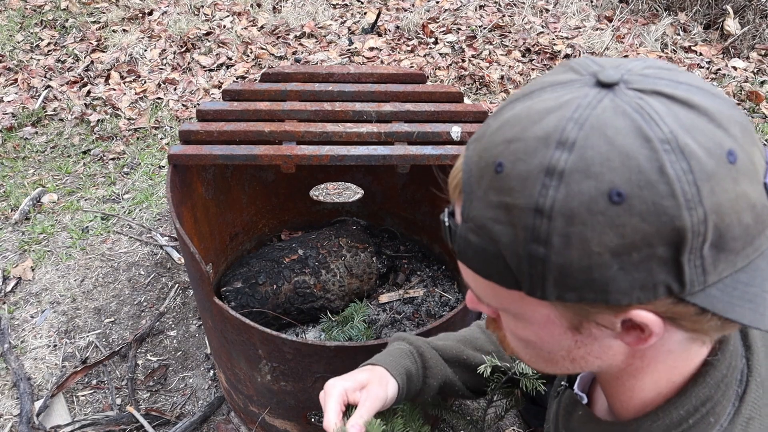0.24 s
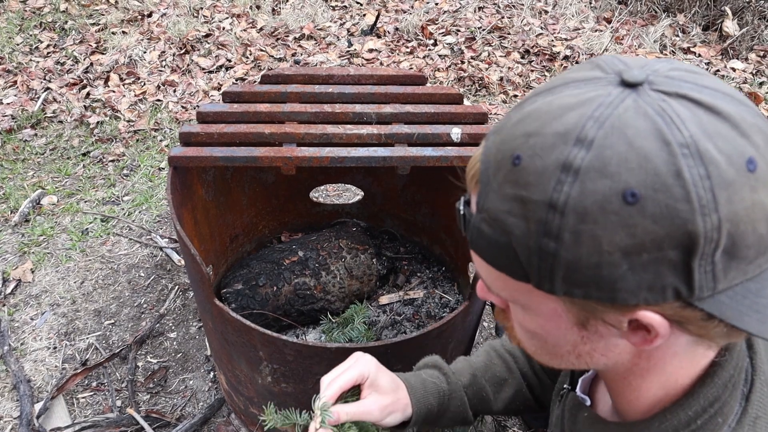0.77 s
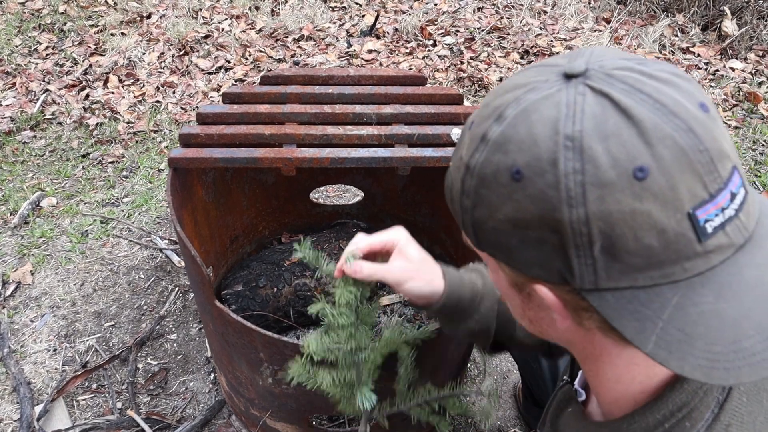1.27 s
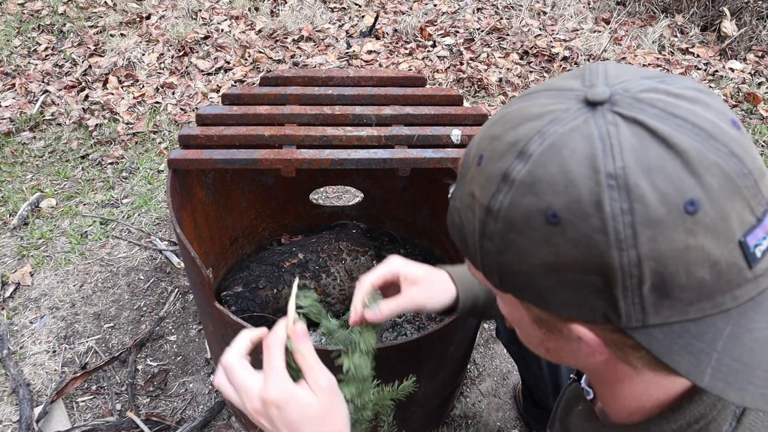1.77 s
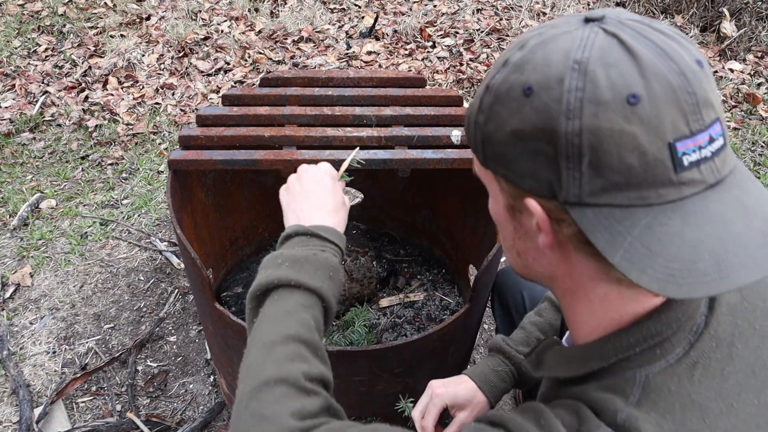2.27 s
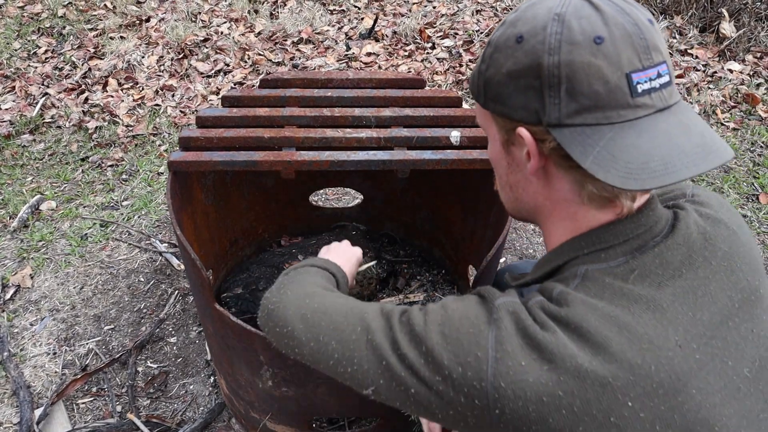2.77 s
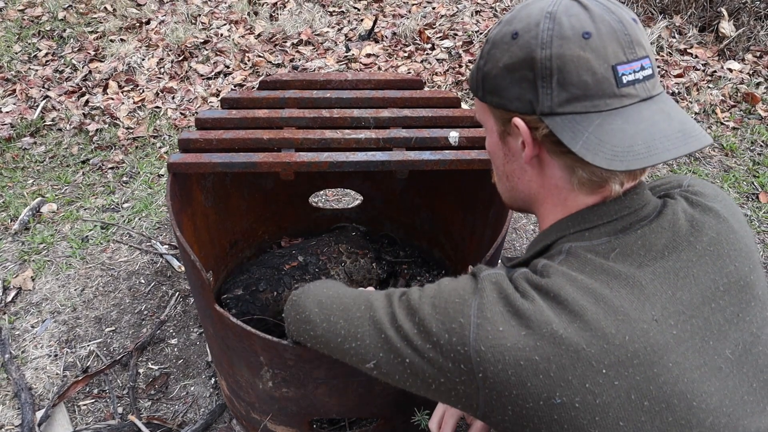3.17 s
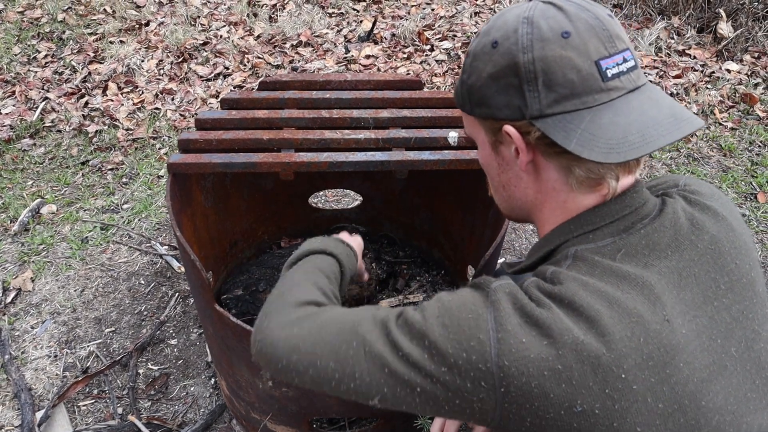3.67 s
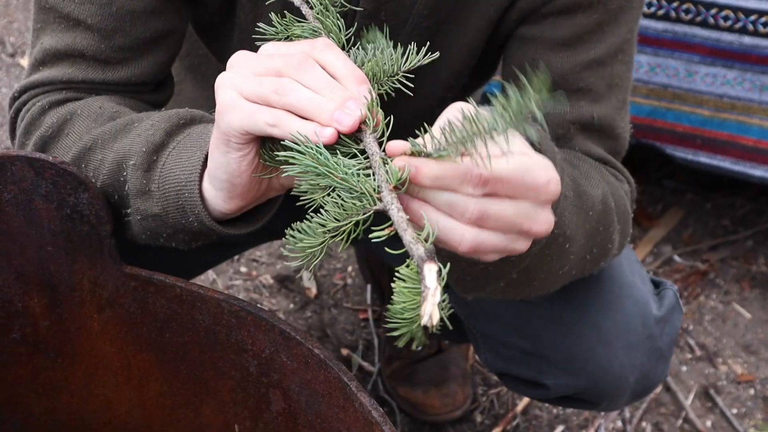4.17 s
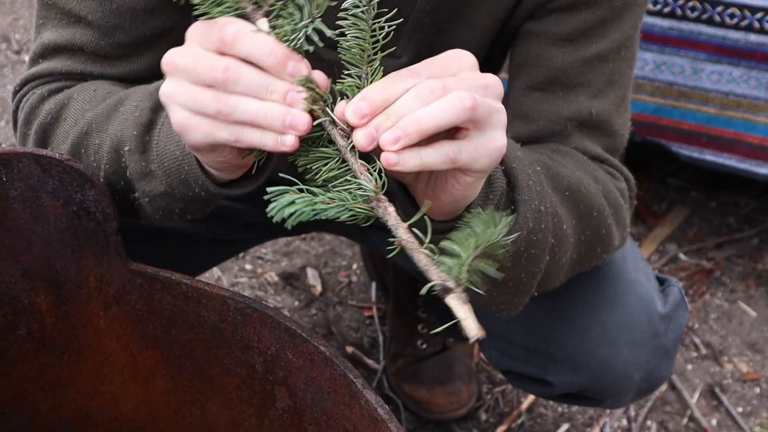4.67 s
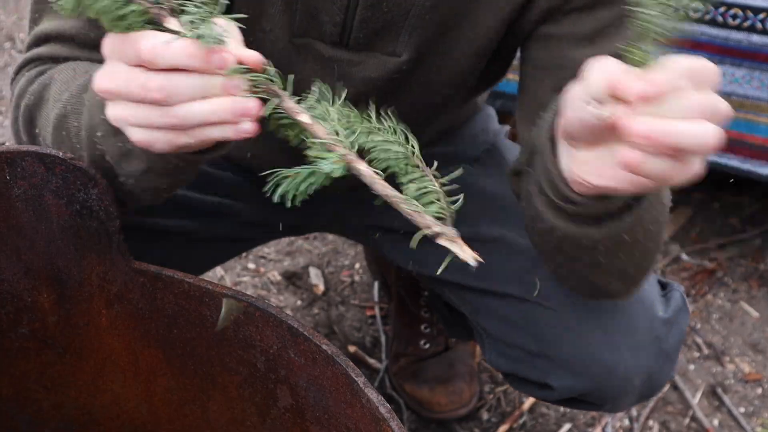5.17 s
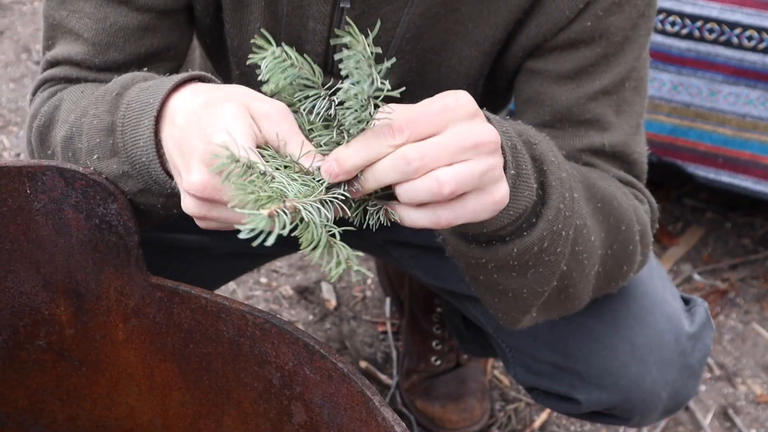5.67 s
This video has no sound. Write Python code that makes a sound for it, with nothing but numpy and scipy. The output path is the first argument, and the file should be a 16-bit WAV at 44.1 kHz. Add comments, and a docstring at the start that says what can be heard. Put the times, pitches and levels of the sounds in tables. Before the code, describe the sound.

Dry, centred close recording of conifer kindling being handled in a quiet wood. A sharp double crack opens, followed by scattered fibre ticks, a tiny rising squeak and brushing needles. Faint sliding, dull rubs and a low thump fill a calmer middle. Plucking crackles resume, peaking in a single hard snap, then fine rustles. Very short echo, soft outdoor wash and slight hiss.

```python
"""In a quiet wood, someone kneels at a steel fire ring and breaks fir twigs for kindling, close by.
Fibres release elastic energy as short damped modes: mostly ticks, twice a sharp snap.
Stick-slip grains make the brushing needles, sliding stems and short rubs; a faint squeak glides upward.
Damped sines make the soft bumps of the body. Decaying noise gives the echo of the ring and the tail
of ground and trees; filtered noise gives the low wash of outdoor air."""
import sys
import numpy as np
from scipy import signal
from scipy.fft import rfft, irfft
from scipy.io import wavfile

SR = 44100
rng = np.random.default_rng(int(sys.argv[2]) if len(sys.argv) > 2 else 0)


def int16_out(signal):
    """Quantize to a 16-bit WAV file."""
    q = np.round(np.clip(np.atleast_2d(signal).T, -1, 1) * 32767)
    wavfile.write(sys.argv[1], SR, q.astype(np.int16))


N = 261072  # length [samples]


def amp(db):
    """Level law: decibels to amplitude ratio."""
    return 10 ** (np.asarray(db) / 20)


def unit(x):
    """Normalisation of power: scales a signal to rms 1."""
    return x / np.sqrt(np.mean(x ** 2) + 1e-20)


def add(mix, s, sound):
    """Linear superposition: adds a sound to the mix in place, from time s."""
    part = mix[max(round(s * SR), 0):][:len(sound)]
    part += sound[:len(part)]


def colour(x, points):
    """Spectral shaping: filters by (Hz, dB) points, interpolated over log frequency, to rms 1."""
    hz, db = np.transpose(points)
    f = np.fft.rfftfreq(len(x), 1 / SR)
    gain = amp(np.interp(np.log(f + 1), np.log(hz + 1), db))
    return unit(irfft(rfft(x) * gain, len(x)))


def ring(hz, width_hz, size=600):
    """Damped resonance: impulse response of one mode, differenced to weaken its bass, at energy 1."""
    t = np.arange(size) / SR
    mode = np.exp(-np.pi * width_hz * t) * np.sin(2 * np.pi * hz * t)
    wave = np.diff(mode, prepend=0)
    return wave / np.linalg.norm(wave)


def thud(hz, width_hz, size=600):
    """Damped resonance: one mode at energy 1, keeping its bass and having less treble than ring."""
    t = np.arange(size) / SR
    wave = np.exp(-np.pi * width_hz * t) * np.sin(2 * np.pi * hz * t)
    return wave / np.linalg.norm(wave)


def slips(length, per_s, spread_db):
    """Stick-slip as a random point process: impulses of either sign, most small and a few large."""
    chance = rng.random(length)
    size = rng.exponential(1, length)
    sign = rng.choice([-1, 1], length)
    return (chance < per_s / SR) * sign * amp(spread_db * np.minimum(size, 4))


# Breaking fibres: (time [s], tick energy [dB], splinter energy [dB], stem energy [dB], stem pitch [Hz])
FIBRE_CRACKS = [(0.1331, -28, -29, -32.5, 3770), (0.1973, 5, -4.5, -4, 2390), (0.216, -14, -31, -29, 3790),
                (0.2247, -12, -22, -23, 3570), (0.2264, -2, -9, -16, 3570), (0.228, 2.5, -5, -5, 3600),
                (0.4047, -38, -20, -27, 3500), (0.5631, -16, -25, -29, 4180),
                (0.6193, -25, -26.5, -34, 3700), (0.6805, -24.5, -31, -27.5, 2120),
                (0.8222, -22, -24, -26, 1810), (0.8649, -24.5, -21, -26.5, 3890),
                (1.0272, -21.5, -30, -38, 1180), (1.1142, -20, -28, -27, 2970),
                (1.1167, -12, -19, -28, 3470), (1.1362, -17.5, -26.5, -24, 2220),
                (1.1696, -18, -25, -25.5, 2710), (1.4989, -35.5, -28.5, -18, 4400),
                (1.5029, -28, -40, -20, 3270), (1.638, -27, -26, -13.5, 2370),
                (1.6443, -25, -27, -13, 1720), (1.6481, -24, -12.5, -12.5, 3760),
                (2.0498, -25.5, -26, -17.5, 1460), (2.2345, -31, -29, -29.5, 2050),
                (2.2391, -34, -27.5, -29, 3420), (2.34, -26, -24, -29.5, 2710),
                (3.9679, -21.5, -50, -34, 4200), (4.1069, -24, -16, -17, 2500),
                (4.1533, -23, -42, -38, 2150), (4.1645, -17, -39, -25, 3630),
                (4.2176, -24, -36.5, -29.5, 4230), (4.321, -18, -32, -33, 1210),
                (4.5105, -21, -24.5, -24, 3560), (4.6892, -16, -42, -9, 3160),
                (4.8708, -19, -35, -20.5, 2460), (5.0553, 2.5, -16, -6.5, 2730),
                (5.0562, -16, -13, -3.5, 3150), (5.0593, -14, -10, -6, 3830),
                (5.5889, -26.5, -30, -25.5, 2340), (5.6406, -22.5, -27, -30, 3680),
                (5.7985, -27, -23.5, -25.5, 2570), (5.9016, -15, -24, -31, 4050),
                (5.916, -15.5, -25, -26, 4090)]
# Stubs tick near one pitch [Hz]; those of weak, fraying fibres stray by up to this share of it
TICK_HZ, TICK_SCATTER = 9960, 0.12


def cracks(rows, tick_width_hz=1600, top_hz=14800, top_width_hz=3500, top_db=-9, splinter_hz=6200,
           splinter_width_hz=1900, stem_width_hz=750, flex_ratio=0.46, flex_width_hz=550, flex_db=-10,
           twist_ratio=1.59, twist_width_hz=700, twist_db=-11, grip_hz=420, grip_width_hz=650, grip_db=-12,
           tear_db=-7, tear_s=0.0014, ragged_db=4, clean_db=-8, lowest_hz=110):
    """Impulsive modal excitation: stub ticks, stem rings, flexes and twists, smaller fibres tear just after."""
    out = np.zeros(N)
    t = np.arange(400) / SR
    grip = amp(grip_db) * ring(grip_hz, grip_width_hz)  # the recoil knocks dully in the fingers
    for s, tick_db, splinter_db, stem_db, stem_hz in rows:
        ragged = max(tick_db, stem_db) < clean_db  # a weak crack frays, a strong one parts more cleanly
        tick_hz = TICK_HZ * (1 + ragged * TICK_SCATTER * (2 * rng.random() - 1))
        # neighbouring modes start with opposite signs, so they add up between their peaks
        tick = ring(tick_hz, tick_width_hz) - amp(top_db) * ring(top_hz, top_width_hz)
        splinter = ring(splinter_hz, splinter_width_hz)
        flex = amp(flex_db) * thud(flex_ratio * stem_hz, flex_width_hz)
        twist = amp(twist_db) * thud(twist_ratio * stem_hz, twist_width_hz)
        stem = thud(stem_hz, stem_width_hz) - flex - twist
        tear = slips(len(t), per_s=12000, spread_db=6) * np.exp(-t / tear_s)
        force = amp(tear_db + ragged * ragged_db) * tear / (np.linalg.norm(tear) + 1e-9)
        force[0] = 1  # the main release comes first
        body = amp(tick_db) * tick + amp(splinter_db) * splinter + amp(stem_db) * (stem + grip)
        add(out, s, np.convolve(force / np.linalg.norm(force), body))
    # thin twigs radiate little bass
    return signal.lfilter(*signal.butter(2, lowest_hz, "highpass", fs=SR), out)


# Spans in which sprigs are bent and plucked: (start [s], end [s])
BENDING_SPANS = [(0.02, 0.19), (0.7, 0.9), (4.7, 5.05), (5.56, 5.92)]
FRAYS_PER_S, FRAY_STEM_HZ = 16, 3400  # the stem pitch varies by half an octave either way
FRAY_TICK_DB, FRAY_SPLINTER_DB, FRAY_STEM_DB = -30, -41, -38
FRAY_SPREAD_DB = 1  # largest departure from these levels, up or down


def frays():
    """Random microfracture: tiny fibres give way under bending, as rows in the columns of FIBRE_CRACKS."""
    rows = []
    for start, end in BENDING_SPANS:
        count = round(FRAYS_PER_S * (end - start))
        for when, strength, pitch in rng.random((count, 3)):
            s = start + (end - start) * when
            db = FRAY_SPREAD_DB * (2 * strength - 1)
            stem_hz = FRAY_STEM_HZ * 2 ** (pitch - .5)
            rows.append((s, FRAY_TICK_DB + db, FRAY_SPLINTER_DB + db, FRAY_STEM_DB + db, stem_hz))
    return rows


# Moves of the hands through the sprigs:
# (start [s], length [s], level of brushing needles [dB], level of sliding stems [dB])
HAND_STROKES = [(0.01, 0.29, -61.5, -66), (0.329, 0.17, -59.5, -60), (0.683, 0.2, -53.5, -51),
                (0.999, 0.26, -46.5, -52.5), (1.045, 0.17, -42, -50.5), (1.213, 0.093, -57.5, -48.5),
                (1.711, 0.16, -52, -51), (1.9, 1.66, -91.5, -62.5), (4.677, 0.077, -57, -54),
                (4.767, 0.063, -58, -52.5), (4.835, 0.058, -49.5, -54.5), (5.041, 0.095, -53, -51.5),
                (5.116, 0.19, -60.5, -58), (5.616, 0.073, -52, -55.5), (5.66, 0.33, -60, -59),
                (5.889, 0.091, -53, -51)]
# Relative spectrum of brushing needles: (frequency [Hz], density [dB per Hz])
NEEDLE_SPECTRUM = [(300, -25), (2000, -10), (4300, -5), (5500, 1), (6400, -8), (8200, -1), (10500, 0),
                   (13000, -5), (16000, -6)]
# Relative spectrum of sliding stems: (frequency [Hz], density [dB per Hz])
STEM_SPECTRUM = [(150, -10), (600, 2.5), (1500, 2.5), (2400, 1.5), (3400, 3.5), (4500, -3.5), (6000, -14),
                 (9000, -8.5), (16000, -7.5)]
HELD_NEEDLES_DB, HELD_STEMS_DB = -69, -66  # sprigs held in the hand never lie quite still
CATCHES_PER_S, CATCH_DB = 70, 2.2  # uneven catching: random levels per second, their standard deviation


def rustle():
    """Friction noise, powers adding: needles flick with a bright grain, bark slides with a duller one."""
    needles, stems = amp(HELD_NEEDLES_DB) ** 2, amp(HELD_STEMS_DB) ** 2
    for start, length, needles_db, stems_db in HAND_STROKES:
        move = stroke(start, length)
        needles = needles + (amp(needles_db) * move) ** 2
        stems = stems + (amp(stems_db) * move) ** 2
    catch_position = np.arange(N) / SR * CATCHES_PER_S
    catch_db = CATCH_DB * np.interp(catch_position, np.arange(N), rng.standard_normal(N))
    brushing = grains(10 * np.log10(needles) + catch_db, NEEDLE_SPECTRUM)
    sliding = grains(10 * np.log10(stems) + catch_db, STEM_SPECTRUM, fewest_per_s=680)
    return brushing + sliding


def stroke(start, length, attack=0.22, release=0.45):
    """Motion envelope: a hand gathers speed, holds and slows to rest, over shares of the length."""
    progress = (np.arange(N) / SR - start) / length
    return np.clip(progress / attack, 0, 1) * np.clip((1 - progress) / release, 0, 1)


def grains(level_db, spectrum, fewest_per_s=220, merge_db=-49, spread_db=3.3):
    """Density-dependent friction: faint motion gives separate flicks, strong motion merges them in a swish."""
    per_s = np.clip(9000 * amp(level_db - merge_db) ** 2.5, fewest_per_s, 9000)
    even_power = slips(N, per_s, spread_db) / np.sqrt(per_s)  # the level no longer depends on the rate
    return amp(level_db) * colour(even_power, spectrum)


# Short rubs of twigs and sleeves:
# (middle [s], length [s], level [dB], resonance [Hz], resonance width [Hz])
SHORT_RUBS = [(0.348, 0.013, -44.5, 1660, 2200), (1.288, 0.027, -35, 3260, 1100),
              (2.181, 0.047, -46.5, 700, 600), (2.191, 0.039, -44.5, 364, 60),
              (2.239, 0.027, -44.5, 676, 700), (2.585, .036, -46.5, 290, 700),
              (2.859, 0.023, -49, 1970, 3000), (2.956, 0.016, -46, 3020, 2200),
              (3.183, .014, -53.5, 2980, 2220), (3.968, 0.011, -46.5, 3330, 2200),
              (4.856, 0.013, -53, 5500, 6000), (5.24, 0.015, -50.5, 3500, 4000),
              (5.403, 0.0079, -52, 3440, 1500)]


def rubs(grit_db=-17, grit_hz=3700, grit_width_hz=3000, cutoff_ratio=0.6):
    """Stick-slip driving a resonance: a brief run of slips swells and fades, with a little bright grit."""
    out = np.zeros(N)
    for s, length, db, hz, width_hz in SHORT_RUBS:
        t = np.arange(0, length, 1 / SR)
        force = slips(len(t), per_s=3000, spread_db=4.0) * np.sin(np.pi * t / length) ** 2
        response = thud(hz, width_hz) + amp(grit_db) * ring(grit_hz, grit_width_hz)
        body = np.convolve(force, response)
        # little sound below the resonance
        body = signal.lfilter(*signal.butter(2, cutoff_ratio * hz, "highpass", fs=SR), body)
        add(out, s - length / 2, amp(db) * body * np.sqrt(len(t) / 2) / (np.linalg.norm(body) + 1e-9))
    return out


# A thin rising squeak: (time [s], pitch [Hz], peak level [dB])
SQUEAK_GLIDE = [(0.827, 3530, -69), (.84, 4376, -49), (0.849, 5100, -45), (.858, 5390, -72)]


def squeak():
    """Frequency modulation: the phase sums a rising frequency, so one faint tone slides upward."""
    s, hz, db = np.transpose(SQUEAK_GLIDE)
    t = np.arange(N) / SR
    phase = 2 * np.pi * np.cumsum(np.interp(t, s, hz)) / SR
    sounding = (t > s[0]) * (t < s[-1])
    return amp(np.interp(t, s, db)) * sounding * np.sin(phase)


# Soft bumps of the body: (time [s], envelope peak [dB], pitch [Hz])
BODY_BUMPS = [(.03, -46, 109), (0.743, -37.5, 78.4), (1.2, -49.5, 73.6), (1.669, -40.5, 90),
              (3.006, -32, 75.5), (3.192, -46.5, 76.5), (4.53, -47, 87)]


def bumps(rise_s=0.0071):
    """Heavily damped oscillation: low pushes, rising and soon dying away, as the body shifts."""
    out = np.zeros(N)
    t = np.arange(SR // 6) / SR
    envelope = t / rise_s * np.exp(1 - t / rise_s)
    for s, db, hz in BODY_BUMPS:
        add(out, s, -amp(db) * envelope * np.sin(2 * np.pi * hz * t))
    return out


def surroundings(x, near_db=-15, near_delay_s=.0036, near_t60=0.0079, far_db=-21, far_t60=0.066):
    """Reverberation by convolution: a smeared echo of the curved ring, a faint tail of ground and trees."""
    t = np.arange(SR // 3) / SR
    spectrum = [(200, 6), (3500, -4), (7000, 0.0), (16000, -10)]  # (Hz, dB)
    # t60: time [s] in which the reflections fall by 60 dB
    near, far = (colour(rng.standard_normal(len(t)), spectrum) * amp(-60 * t / t60)
                 for t60 in (near_t60, far_t60))
    response = amp(near_db) * near / np.linalg.norm(near) + amp(far_db) * far / np.linalg.norm(far)
    out = x.copy()
    add(out, near_delay_s, signal.fftconvolve(x, response))
    return out


# Relative spectrum of the outdoor air: (frequency [Hz], density [dB per Hz])
AIR_SPECTRUM = [(12, -30), (20, 3), (81, -3.5), (113, -4), (240, -7.5), (435, -6.5), (730, -8),
                (1020, -7.5), (1350, -12), (2100, -15.5), (3100, -19), (4000, -26), (5000, -19.5),
                (5600, -52), (16000, -43)]
AIR_DB = -52
QUIETER_S, QUIETER_DB = 3.9, -2.24  # the air is a little quieter from this time on


def air(drone_hz=84, drone_width_hz=16, drone_db=-65):
    """Filtered noise: a broad wash of distant trees, with a faint low drone as a narrow noise band."""
    level = amp(AIR_DB + QUIETER_DB * (np.arange(N) / SR > QUIETER_S))
    wash = level * colour(rng.standard_normal(N), AIR_SPECTRUM)
    resonance = ring(drone_hz, drone_width_hz, size=8000)
    drone = signal.fftconvolve(rng.standard_normal(N), resonance)[:N]
    return wash + amp(drone_db) * unit(drone)


def scene():
    """Superposition of sources: hands, bumps and open air, the same in both channels."""
    outdoors = air()
    hands = rustle() + rubs() + squeak() + cracks(FIBRE_CRACKS + frays())
    mono = surroundings(hands) + bumps() + outdoors
    return np.array([mono, mono])


# Resonances of the microphone's housing: (frequency [Hz], width [Hz], gain [dB])
HOUSING_MODES = [(3850, 750, 3.5), (4780, 800, -12), (5480, 450, 4)]
# Relative spectrum of the microphone's own hiss: (frequency [Hz], density [dB per Hz])
HISS_SPECTRUM = [(1000, -3), (6000, -1), (9000, -2), (16000, -5.5)]
HISS_DB, EDGE_HZ = -59, 16100  # hiss level, upper band limit


def record(dry):
    """Linear transduction with self-noise: the housing colours, the microphone hisses, the band is limited."""
    out = dry
    for hz, width_hz, db in HOUSING_MODES:
        resonance = signal.lfilter(*signal.iirpeak(hz, hz / width_hz, SR), out)
        out = out + (amp(db) - 1) * resonance
    out = out + amp(HISS_DB) * colour(rng.standard_normal(N), HISS_SPECTRUM)
    lowpass = signal.firwin(255, EDGE_HZ, window=("kaiser", 9), fs=SR)
    return signal.oaconvolve(out, lowpass[None], "same")


dry = scene()
out = record(dry)
int16_out(out)
```